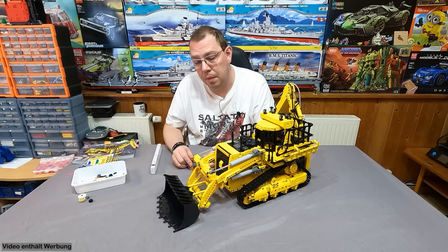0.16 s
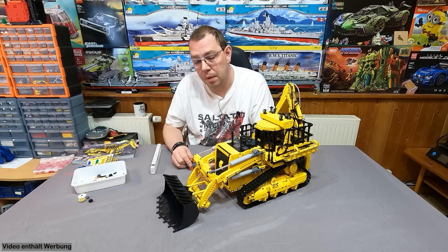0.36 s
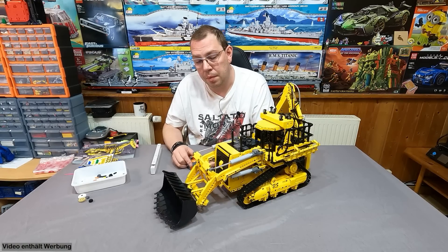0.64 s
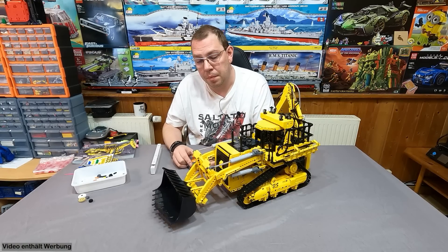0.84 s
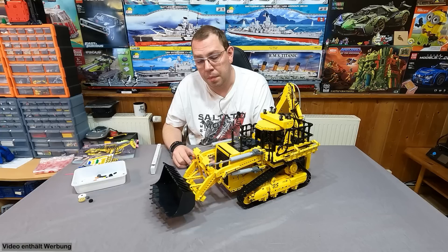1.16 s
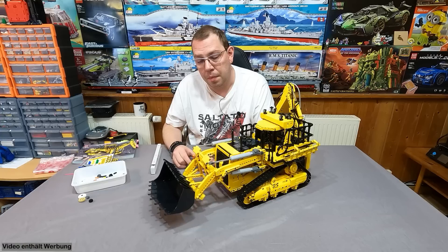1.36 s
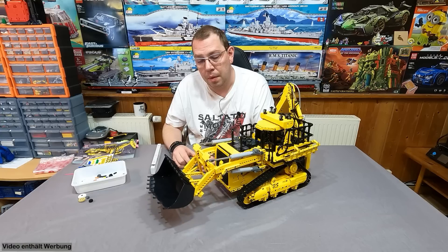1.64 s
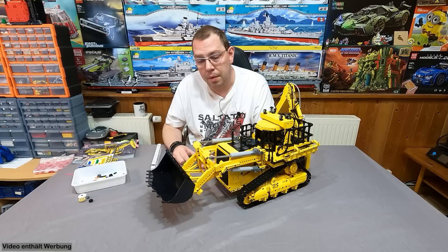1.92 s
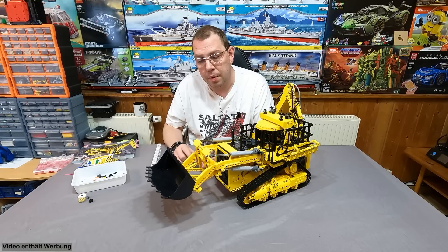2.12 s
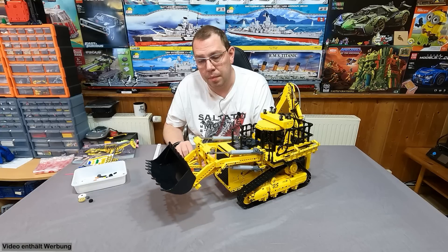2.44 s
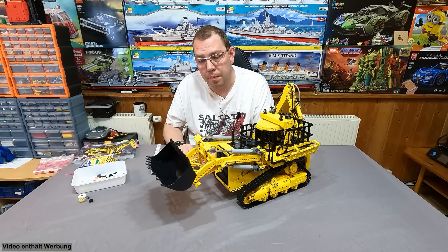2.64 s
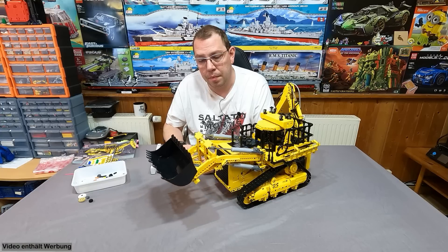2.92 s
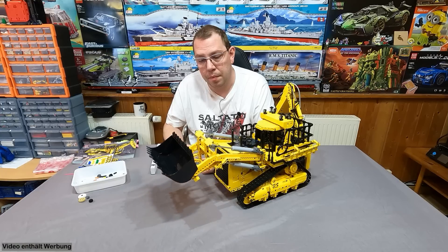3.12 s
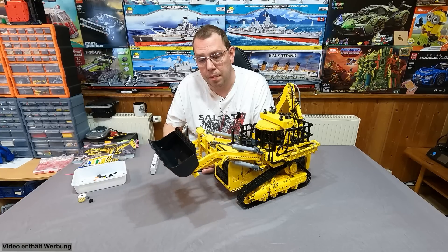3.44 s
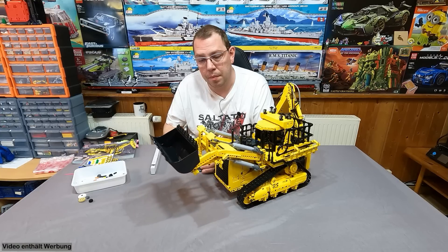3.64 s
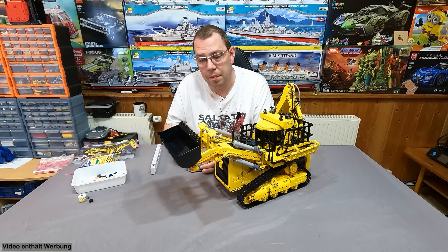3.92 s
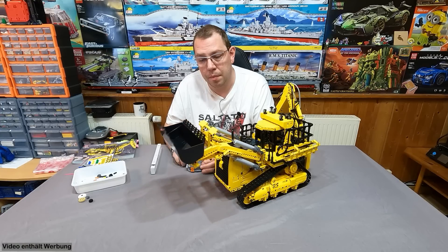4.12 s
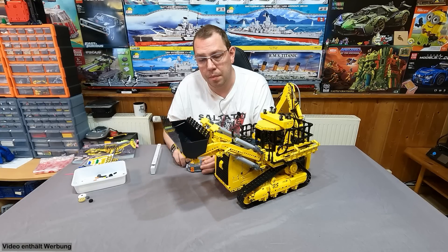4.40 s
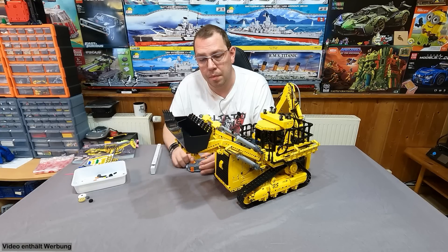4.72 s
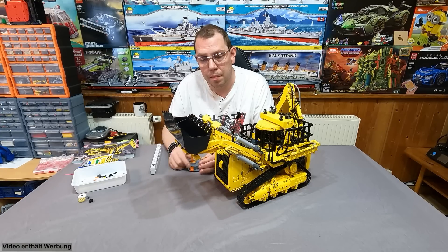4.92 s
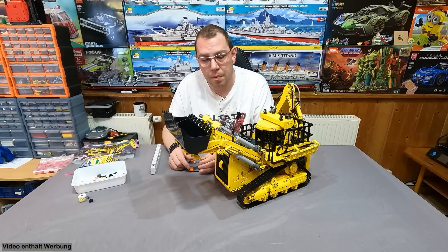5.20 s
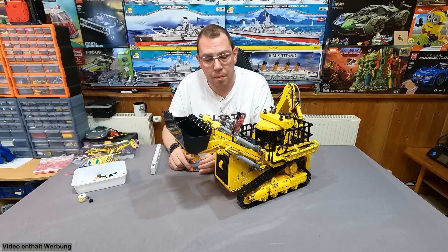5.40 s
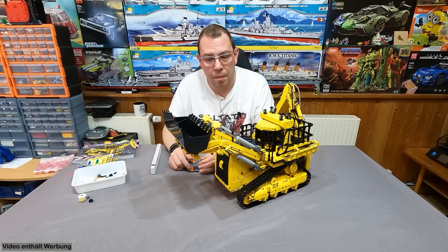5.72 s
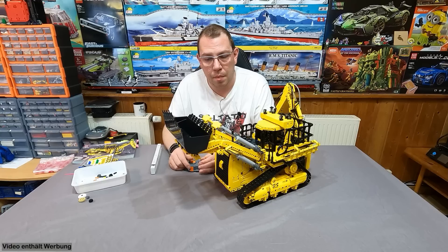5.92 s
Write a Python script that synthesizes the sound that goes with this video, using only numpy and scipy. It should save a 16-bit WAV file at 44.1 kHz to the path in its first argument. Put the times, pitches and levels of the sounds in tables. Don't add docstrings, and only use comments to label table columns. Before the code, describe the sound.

A plastic motorised toy loader works on a table in a quiet room, heard dry and close by one microphone, in mono. At 0 s one small motor already buzzes thinly. Remote levers click at 0.23, 0.31 (hardest) and 0.47 s; from 0.32 s a rougher, hissing lift motor joins, with gearbox growl, fine rattle and low table thrum. Uneven hard clacks slip until 0.8 s. From about 0.9 to 2.6 s a lighter worn tooth clacks evenly, nearly ten times a second, alternating stronger and weaker. From 2.6 to 3.75 s the second motor strains with a bright ring and loud, sharp, irregular clacks. Both dip at 3.85 s, then run smoother until 4.7 s with a faint high whine. They wind down with ticks, tiny chirps and a hard knock at 4.96 s. After a twitch, one motor restarts at 5.1 s and whines alone to the end; a falling squeak comes at 5.73 s.

```python
import sys
import numpy as np
from scipy import signal
from scipy.fft import irfft
from scipy.io import wavfile
from scipy.ndimage import uniform_filter1d, map_coordinates

SR = 44100
rng = np.random.default_rng(int(sys.argv[2]) if len(sys.argv) > 2 else 0)


def rack_gain(trim_db):
    fader = np.asarray(trim_db, float)
    return 10 ** (fader / 20)


def dump_mix(stems):
    frames = np.atleast_2d(stems).T
    limited = np.clip(frames, -1, 1)
    pcm = np.round(limited * 32767).astype(np.int16)
    wavfile.write(sys.argv[1], SR, pcm)


N = 267157

# (centre [Hz], width [Hz], boost [dB])
TOOTH_RINGS = [(290, 120, 5), (1540, 330, 7.5), (1830, 270, 4), (2770, 105, 6), (3400, 430, 2.5),
               (5210, 800, 4), (6430, 1000, 8.5), (4070, 270, -16.5)]


def evened(x):
    return x / np.sqrt(np.mean(x ** 2) + 1e-20)


def add(mix, s, sound):
    part = mix[round(s * SR):][:len(sound)]
    part += sound[:len(part)]


def curves(rows):
    s, *columns = np.transpose(rows)
    t = np.arange(N) / SR
    gate = uniform_filter1d(1. * (t >= s[0]) * (t <= s[-1]), 441)
    return gate, *(np.interp(t, s, c) for c in columns)


def colour(x, points, rings=()):
    hz = abs(np.fft.fftfreq(8192, 1 / SR))
    f, db = np.transpose(points)
    db = np.interp(np.log(hz + 1), np.log(f + 1), db)
    for at_hz, width, up_db in rings:
        db = db + up_db / (1 + (2 * (hz - at_hz) / width) ** 2)
    log_gain = np.log(rack_gain(np.maximum(db, -100)))
    taps = np.fft.ifft(np.exp(log_gain - 1j * signal.hilbert(log_gain).imag)).real[:4096]
    return signal.oaconvolve(x, taps)[:len(x)]


def wander(hz):
    knots = rng.standard_normal(2000)
    coarse = np.arange(0, N + 32, 32)
    smooth = map_coordinates(knots, [coarse * hz / SR], order=3)
    return evened(np.interp(np.arange(N), coarse, smooth))


def runs(rows, rise, coast, order=1):
    on, off, *columns = np.transpose(rows)[:, :, None]
    t = np.arange(N) / SR
    fade_db = -rise * np.maximum(on - t, 0) ** order - coast * np.maximum(t - off, 0) ** order
    nearest = np.argmax(fade_db, axis=0)
    return np.max(fade_db, axis=0), *(uniform_filter1d(c[nearest, 0], size=2000) for c in columns)


def motors():
    # (on [s], off [s], level [dB])
    lift_runs = [
        (0.32, 3.79, -37.5),
        (3.9, 4.65, -38.5),
    ]
    # (on [s], off [s], level [dB], strain [0-1], hum [dB])
    tilt_runs = [
        (0, .36, -45, 0.63, -68),
        (.46, .6, -46.5, 0.98, -53),
        (2.64, 3.8, -45, 0.9, -75),
        (3.92, 4.7, -44, 0.03, -60),
        (5.025, 5.06, -47, 0.37, -59),
        (5.1, 6.1, -44.5, 0.44, -52),
    ]
    fade_db, lift_db = runs(lift_runs, rise=1300, coast=2600, order=2)
    tilt_fade_db, tilt_db, strain, hum_db = runs(tilt_runs, rise=4700, coast=340, order=2)
    reverse_s, reverse_width_s = 3.85, 0.042
    brake = np.exp(-((np.arange(N) / SR - reverse_s) / reverse_width_s) ** 2)
    tilt_fade_db = tilt_fade_db - 11.5 * brake
    return lift_db + fade_db + 2 * brake, tilt_db + tilt_fade_db, strain, hum_db + 2 * tilt_fade_db


def brushes(speed, bars, repeat, sharp, wobble):
    turns = np.cumsum(speed * (1 + wobble * wander(40.))) / SR
    place = np.arange(8192) / 8192
    uneven = (.6 + rng.rayleigh(1, (2, 140))) * np.minimum(np.arange(140) / 40, 1)
    tracks = irfft(uneven * np.exp(2j * np.pi * rng.random((2, 140))), 8192)
    one, other = (np.interp(turns % 1, place, track) for track in tracks)
    drift = 1.46 * wander(9.)
    worn = np.cos(drift) * one + np.sin(drift) * other
    contact = repeat * evened(worn) + np.sqrt(1 - repeat ** 2) * rng.standard_normal(N)
    pulse = np.exp(sharp * np.cos(2 * np.pi * bars * turns) + 0.2 * sharp * np.cos(2 * np.pi * turns))
    return contact * evened(pulse), turns


def knocks(rows, rings, crack_s, tail_db, thud, t60s):
    out, t = np.zeros(N), np.arange(6000) / SR
    hz = [60, 290, 600, 1600, 5400, 12000, 16000]
    for s, peak_db, snap_db, sizzle_db in rows:
        noise = rng.standard_normal(6000)
        thud_db = thud[0] + thud[1] * peak_db
        t60 = max(t60s[0] + t60s[1] * peak_db, .015)
        shudder = signal.lfilter([.35], [1, -.65], noise[::-1])
        chatter = noise * np.exp(-(t / crack_s) ** 2) + shudder * rack_gain(tail_db - 60 * t / t60)
        blow = chatter * np.minimum(t / 0.00023, 1) / 3
        dip_db = (thud_db + peak_db) / 2 + 5
        tone_db = [thud_db - 14, thud_db + 16, dip_db, peak_db, snap_db + 10, sizzle_db - 5, sizzle_db - 6]
        add(out, s - .0006, colour(blow, list(zip(hz, tone_db)), rings))
    return out


def dying_modes(rows):
    out, t = np.zeros(N), np.arange(2400) / SR
    for s, peak_db, hz, width in rows:
        fade = (1 - np.exp(-t / .0005)) * np.exp(-t * width / 2)
        add(out, s, rack_gain(peak_db) * np.sin(2 * np.pi * hz * t) * fade)
    return out


def tilt_motor():
    # (time [s], speed [turns per s])
    shaft_speed = [(0, 180.5), (.22, 181.5), (.45, 171), (2.55, 163), (2.95, 170.5), (3.75, 170.8),
                   (3.86, 160), (3.97, 173), (4.1, 171.5), (4.6, 170), (4.72, 172.5), (4.79, 144),
                   (4.95, 80), (5.04, 176), (5.1, 183.3), (5.2, 179.8), (5.49, 178.4), (5.62, 180.2)]
    # (frequency [Hz], level [dB per Hz])
    can_colour = [(410, -34), (700, -4), (1080, 2), (1180, -24), (1640, 4.5), (1820, -6), (2590, -7.5),
                  (3280, -4.5), (3990, -16), (4610, -8), (6830, -3.5), (8210, -5), (10800, -9),
                  (12300, -13.5), (16000, -14.5)]
    # (centre [Hz], width [Hz], boost [dB])
    can_rings = [(4660, 630, 10), (7975, 200, 10.5), (8800, 97, 2.5), (9900, 110, -18), (10020, 1300, 9),
                 (6190, 100, 6), (3170, 50, 10), (1640, 470, 1.5), (11400, 470, 7), (12200, 1000, -1.5)]
    # (frequency [Hz], level [dB per Hz])
    load_colour = [(4000, -49.5), (6800, -23), (7300, 6), (7600, -7), (8220, 4), (8550, 1.5), (9000, -32),
                   (12000, -17.5)]
    # (multiple of the shaft rate, level [dB])
    hum_orders = [(1, -6), (2, 0), (3, -9), (9, -14)]
    # (multiple of the shaft rate, on [s], off [s], level [dB], fade [dB per s])
    mesh_tones = [
        (31, 4.735, 4.785, -46.5, 800),
        (26, .215, .235, -43, 600),
        (26, 3.98, 4.66, -52, 400),
        (26, 4.7, 4.72, -48, 500),
        (26, 5.1, 6.1, -50.5, 200),
        (9, 4, 4.7, -52.5, 300),
        (12, 4, 4.65, -55, 100),
    ]
    contact, turns = brushes(curves(shaft_speed)[1], bars=2, repeat=.8, sharp=.3, wobble=.0012)
    can = evened(colour(contact, can_colour, can_rings))
    ring = evened(colour(contact + .5 * rng.standard_normal(N), load_colour))
    _, can_db, strain, hum_db = motors()
    out = np.zeros(N)
    for order, db in hum_orders:
        out += rack_gain(db + hum_db + 1.2 * wander(8.) + 6.0) * np.sin(2 * np.pi * order * turns)
    for order, on, off, db, fade in mesh_tones:
        level = rack_gain(db + runs([(on, off)], fade, fade)[0] + 3.5 * wander(30.))
        out += level * np.sin(order * (2 * np.pi * turns + .06 * wander(45.)))
    ring_db = can_db - 8 + 17 * strain
    return out + rack_gain(can_db + 6.5) * can + rack_gain(ring_db) * ring


def frame():
    # (frequency [Hz], level [dB per Hz])
    grind_colour = [(110, -60), (190, -18.5), (236, -6.5), (324, -3), (415, -5), (783, -5), (931, -12.5),
                    (1520, -4), (4240, -14), (6000, -7), (7800, -32), (13200, -120)]
    # (frequency [Hz], level [dB per Hz])
    thrum_colour = [(8.8, -28), (15, -20), (43, 1), (70, -7), (102, -2), (140, 1), (173, -5), (260, -6.5),
                    (340, -29), (570, -120)]
    # (centre [Hz], width [Hz], boost [dB])
    panel_rings = [(97, 16, 5), (58, 10, 3), (76, 14, -6)]
    grind_rest_db, thrum_rest_db = -62, -55
    lift_db, tilt_db, strain, _ = motors()
    grind_gain = np.hypot(rack_gain(lift_db - 5.5), rack_gain(tilt_db - 3 + 9.5 * strain))
    raised = np.clip(np.arange(N) / SR - 3.6, 0, .25) * 4
    thrum_gain = np.hypot(rack_gain(lift_db - 8.5 - 1.5 * raised), rack_gain(tilt_db - 25.5 + 29 * strain))
    grind = evened(colour(rng.standard_normal(N) * rack_gain(2.23 * wander(60.)), grind_colour))
    thrum = evened(colour(rng.standard_normal(N) * rack_gain(1.3 * wander(26.0)), thrum_colour, panel_rings))
    grind = grind * np.hypot(grind_gain, rack_gain(grind_rest_db))
    return grind + thrum * np.hypot(thrum_gain, rack_gain(thrum_rest_db))


def quiet_room():
    # (frequency [Hz], level [dB per Hz])
    room_colour = [(20, -5), (130, 0), (600, -20), (1800, -22), (3700, -30), (10000, -27), (16000, -29)]
    return rack_gain(-60) * evened(colour(rng.standard_normal(N), room_colour))


def ticks():
    # (time [s], peak [dB], frequency [Hz], width [Hz])
    tick_events = [
        (4.8235, -19, 11000, 4000),
        (4.8504, -14, 11200, 2400),
        (5.075, -20, 13200, 2700),
        (0.2, -29, 200, 530),
        (4.964, -27, 123, 280),
    ]
    return dying_modes(tick_events)


def lever_clicks():
    # (time [s], knock [dB], snap [dB], sizzle [dB])
    clicks = [
        (0.2308, -28, -30, -42),
        (0.3078, -13, -20, -34),
        (0.4686, -20, -30, -42),
    ]
    # (frequency [Hz], width [Hz])
    shell_modes = [(935, 680), (1355, 770), (1850, 710)]
    # (first mode [dB], second mode [dB], third mode [dB])
    shell_levels = [
        (-24, -33, -30.5),
        (-15.5, -7.5, -26),
        (-13.5, -14, -16),
    ]
    shell = []
    for click, levels in zip(clicks, shell_levels):
        for db, (hz, width) in zip(levels, shell_modes):
            shell.append((click[0], db, hz, width))
    snaps = knocks(clicks, [], crack_s=0.0071, tail_db=-4, thud=(-29, .01), t60s=(.021, .00001))
    return snaps + dying_modes(shell)


def lift_motor():
    # (frequency [Hz], level [dB per Hz])
    can_colour = [(1470, -33), (2500, -29), (3280, -22), (4170, -14.5), (4990, -5.5), (5780, -1.5),
                  (6550, 1.5), (6860, -0.5), (7470, -7.5), (8140, -3.5), (8940, -11), (9660, -5),
                  (11200, -15), (15200, -13.5), (16000, -28)]
    # (frequency [Hz], level [dB per Hz])
    box_colour = [(290, -18), (500, -34), (746, -3.5), (888, -11.5), (1020, -3), (1230, -10), (1720, -0.5),
                  (2270, -8.5), (2520, -8.5), (3270, -11), (4000, -15), (5200, -35), (8800, -120)]
    # (centre [Hz], width [Hz], boost [dB])
    rings = [(6680, 200, 9.5), (6250, 350, 4), (5150, 450, 3), (5760, 340, -9), (1750, 110, 5),
             (1520, 90, 4)]
    can_db, tilt_db, strain, _ = motors()
    box_db = can_db - 6 + 2.5 * strain * np.minimum(rack_gain(tilt_db + 39), 1)
    contact, turns = brushes(116.5 * np.ones(N), bars=3, repeat=.45, sharp=.2, wobble=.008)
    can = evened(colour(contact, can_colour, rings[:4])) * rack_gain(can_db + 0.5 + 0.7 * wander(9.7))
    rough = rng.standard_normal(N) * rack_gain(1.2 * wander(90.))
    box = evened(colour(rough + 0.58 * contact, box_colour, rings[4:])) * rack_gain(box_db + 2.5)
    mesh = np.sin(2 * np.pi * 15 * turns + .9 * wander(50.)) * rack_gain(box_db - 2 + 1.8 * wander(30.))
    hits = rack_gain(3.1 * np.minimum(rng.exponential(1, N), 3)) * (rng.random(N) < 120 / SR)
    burst = rng.standard_normal(300) * np.exp(-np.arange(300) / 60.)
    rattle = signal.oaconvolve(hits, burst)[:N]
    rattle = colour(rattle, [(100, -30), (1500, -25), (7000, -1), (16000, 2)], TOOTH_RINGS)
    return can + box + mesh + evened(rattle) * rack_gain(box_db - 8)


def with_sizzle(rows):
    snap_db = np.asarray(rows)[:, 2]
    sizzle_db = snap_db - 8 + 1.34 * np.maximum(snap_db + 26.5, 0)
    return np.column_stack([rows, sizzle_db])


def strained_clacks():
    # (time [s], knock [dB], snap [dB])
    slips = [(0.351, -15.5, -33), (0.3825, -20, -28), (0.3987, -5, -16), (0.5112, -11, -26),
             (0.5367, -19, -27), (0.5916, -27, -26), (0.6102, -4.5, -17), (0.686, -24, -50),
             (0.7103, -7.5, -20), (0.7614, -16, -31), (0.8248, -15, -41), (2.604, -18, -45),
             (2.6901, -4, -15.5), (2.781, -7.5, -18), (2.8674, -15, -24), (2.8994, -4, -14.5),
             (2.9873, -11.5, -22.5), (3.0062, -31, -26), (3.1036, -5.5, -19), (3.2174, -13.5, -26),
             (3.3161, -4.5, -14.5), (3.3944, -17, -27), (3.4266, -6.5, -22.5), (3.5079, -15, -28),
             (3.5266, -3, -15), (3.6022, -30, -26), (3.6396, -2.5, -13.5), (3.7454, -15, -27),
             (3.9379, -20, -30), (5.075, -22.5, -30.5)]
    return knocks(with_sizzle(slips), TOOTH_RINGS, crack_s=0.0051, tail_db=-1.5,
                  thud=(-15, 1.05), t60s=(.135, .0035))


def light_clacks():
    # (centre [Hz], width [Hz], boost [dB])
    wheel_ring = (5500, 500, 6)
    start_s, turn_s, slowing_s = 1.0264, .10286, .0000645
    k = np.arange(17) - 1
    odd = k % 2
    chance_db = 2 * rng.standard_normal((2, 17))
    s = start_s + turn_s * k + slowing_s * k ** 2
    knock_db = -17 - 1.5 * odd + chance_db[0]
    snap_db = -29 - 5 * odd + chance_db[1]
    rows = with_sizzle(np.transpose([s, knock_db, snap_db]))
    return knocks(rows, TOOTH_RINGS + [wheel_ring], crack_s=0.0044, tail_db=-0.5,
                  thud=(-16, 1), t60s=(.13, .0035))


def whine():
    # (on [s], off [s], level [dB], fade [dB per s])
    whines = [
        (3.1, 4.65, -54, 70),
        (4.9262, 4.939, -42.5, 5000),
        (4.95, 4.966, -44, 1500),
        (5.1, 5.2, -61, 100),
    ]
    level = sum(rack_gain(db + runs([(on, off)], fade, fade)[0]) for on, off, db, fade in whines)
    turn = 2 * np.pi * np.cumsum(2017 * (1 + 0.00132 * wander(30.))) / SR
    return level * np.sqrt(2) * (np.sin(turn) + rack_gain(-21) * np.sin(2 * turn))


def gears_settle():
    # (time [s], knock [dB], snap [dB], sizzle [dB])
    stops = [
        (4.738, -26.5, -60, -46),
        (4.862, -23, -48, -52),
        (4.964, -7, -30.5, -17),
    ]
    # (centre [Hz], width [Hz], boost [dB])
    stop_rings = [(101, 90, 25), (800, 120, 8), (927, 170, 10), (1920, 150, 7), (2810, 610, 13),
                  (3770, 230, 10), (5610, 1300, 12), (8600, 570, 15), (4150, 360, -19)]
    return knocks(stops, stop_rings, crack_s=0.0081, tail_db=3, thud=(-25, .6), t60s=(.065, .001))


def squeak():
    # (time [s], frequency [Hz], level [dB])
    path = [
        (5.728, 4950, -55),
        (5.738, 4900, -35),
        (5.746, 4720, -33),
        (5.755, 4660, -35),
        (5.76, 4650, -43),
        (5.772, 4600, -42),
        (5.779, 4530, -37),
        (5.784, 4520, -52),
    ]
    gate, hz, db = curves(path)
    turn = 2 * np.pi * np.cumsum(hz * (1 + 0.0052 * wander(200.))) / SR
    tone = np.sin(turn) + rack_gain(-13) * np.sin(3 * turn)
    return gate * rack_gain(db + 2.5 * wander(150.)) * np.sqrt(2) * tone


def scene():
    drive = tilt_motor() + frame() + lift_motor() + whine()
    clacks = strained_clacks() + light_clacks()
    small_parts = ticks() + lever_clicks() + gears_settle() + squeak()
    return np.tile(drive + clacks + small_parts + quiet_room(), (2, 1))


def band_limit(x):
    return signal.sosfilt(signal.butter(12, 16980, fs=SR, output="sos"), x)


def record(dry):
    edge = signal.firwin(511, 15880, window=("kaiser", 9), fs=SR)
    mix = signal.oaconvolve(dry, edge[None], "same")
    return band_limit(mix)


dry = scene()
out = record(dry)
dump_mix(out)
```